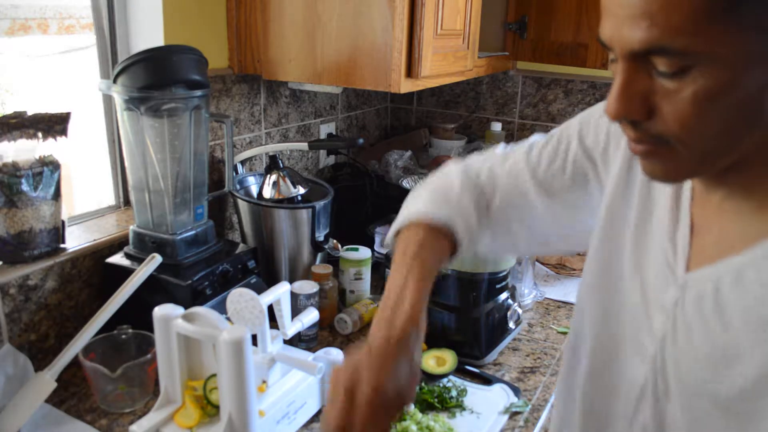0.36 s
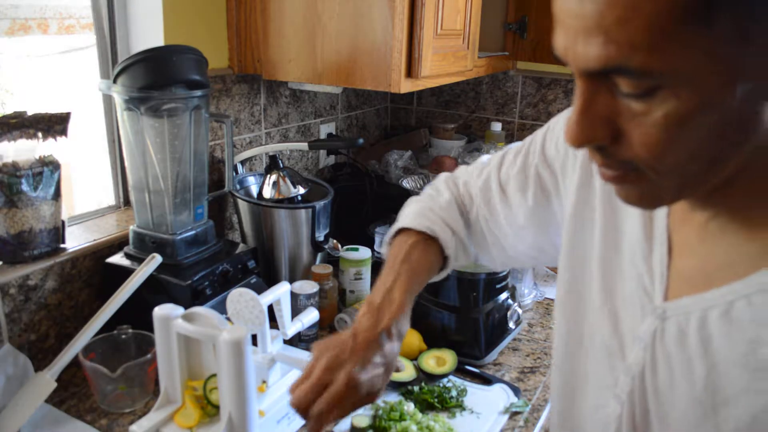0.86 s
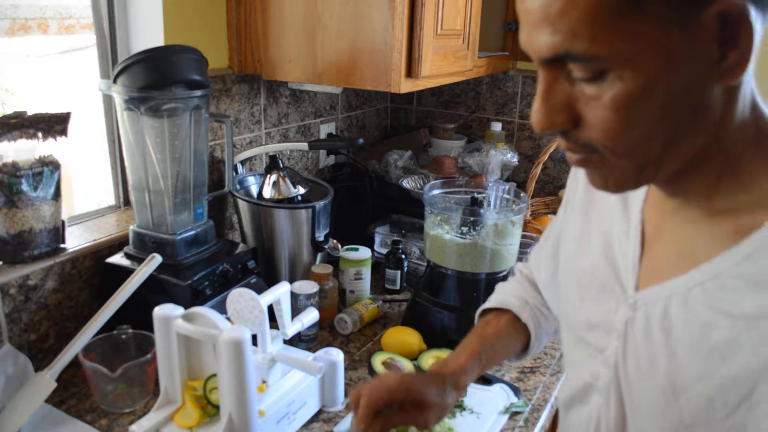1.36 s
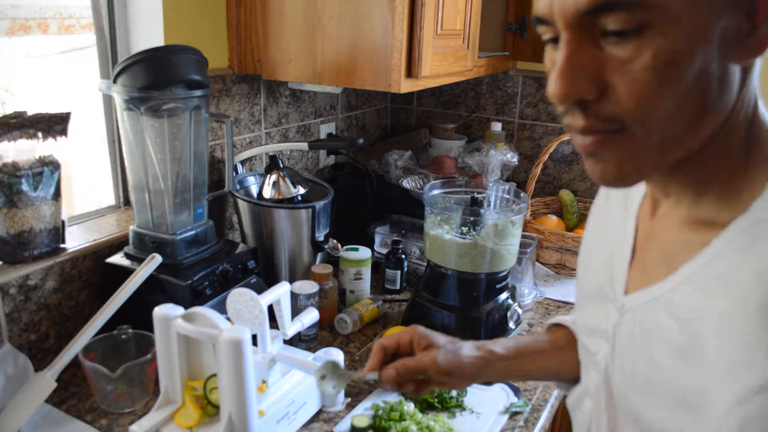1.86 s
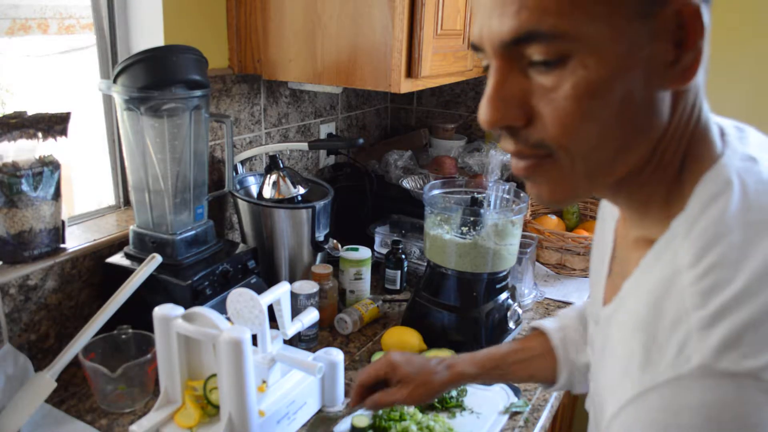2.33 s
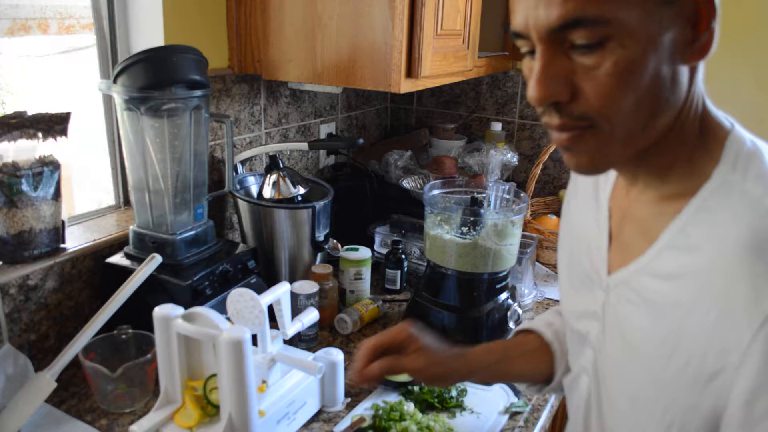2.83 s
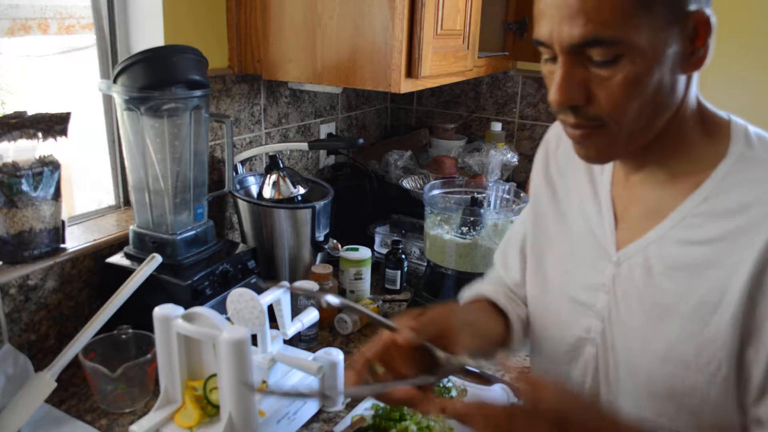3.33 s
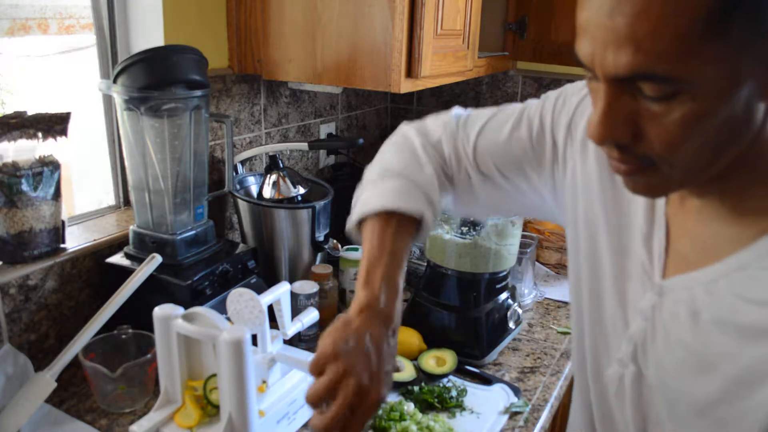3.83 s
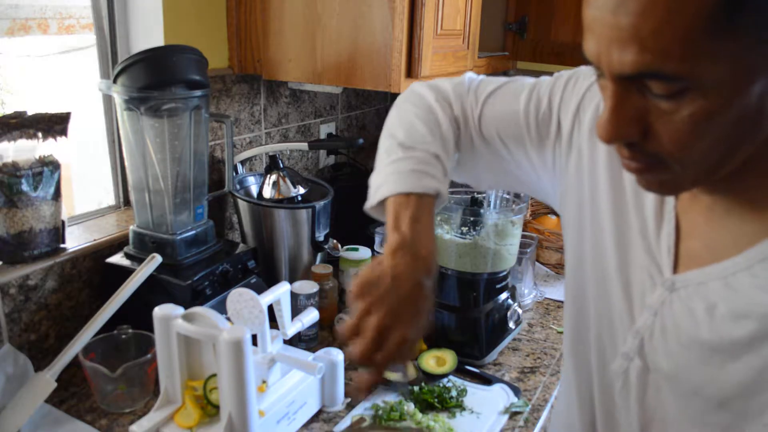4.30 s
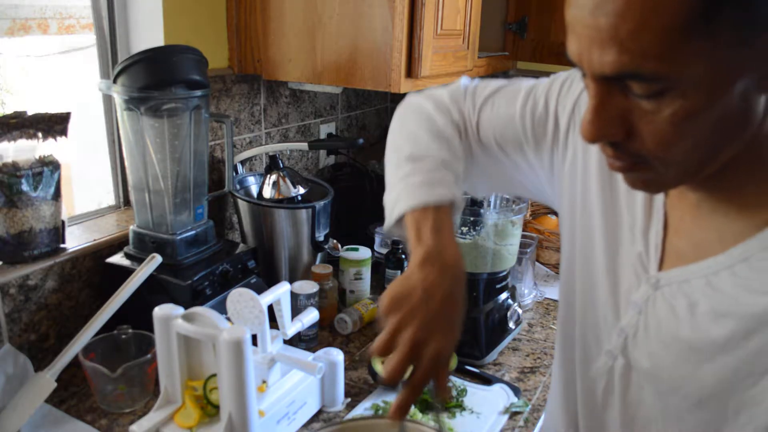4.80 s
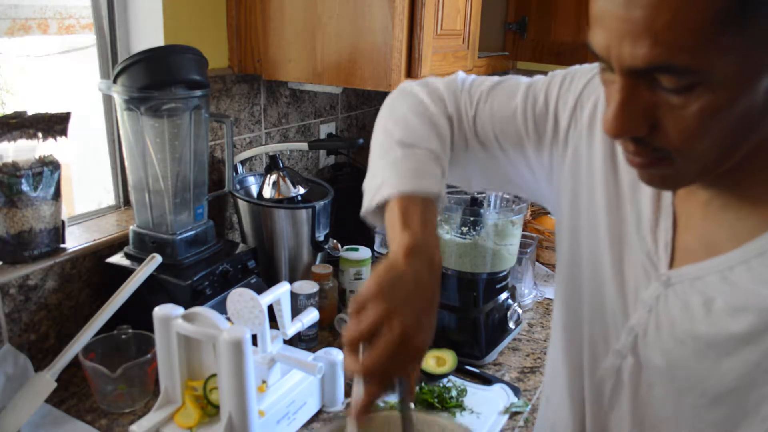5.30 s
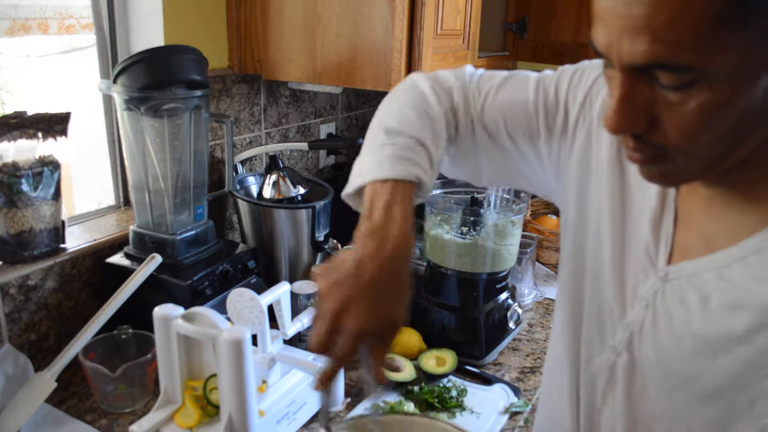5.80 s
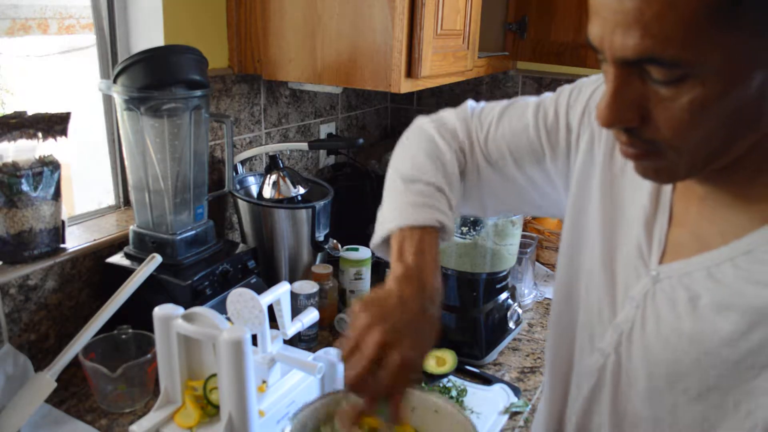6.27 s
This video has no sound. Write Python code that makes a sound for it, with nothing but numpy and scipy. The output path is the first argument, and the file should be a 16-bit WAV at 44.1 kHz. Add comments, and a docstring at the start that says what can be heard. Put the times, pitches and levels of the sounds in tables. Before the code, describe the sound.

Close metal spoon bangs on a bowl rim, spoon and fork clink and slide together, then soft wet rustles of food being tossed over appliance hum.

```python
"""Three knocks of a spoon on a bowl, a rattle and clink as spoon and fork are gathered, one more strike on
the bowl, then chopped food tossed in it: a small hard kitchen with appliance hum, heard close to.
Blows are short noise bursts shaped by the resonances of cutlery and bowl; slides are grains ringing
spoon and fork; cloth and food are swelling hiss and crackle; hums are unsteady sines and band noise.
Echoes answer the cutlery and bowl, and the microphone clips whatever passes full scale."""
import sys
import numpy as np
from scipy import signal
from scipy.fft import rfft, irfft, next_fast_len
from scipy.io import wavfile
from scipy.ndimage import uniform_filter1d

SR = 44100
rng = np.random.default_rng(int(sys.argv[2]) if len(sys.argv) > 2 else 0)


def store_wav(level_fs):
    """Save 16-bit WAV to argv[1]."""
    pcm = np.round(np.clip(np.atleast_2d(level_fs), -1, 1) * 32767)
    wavfile.write(sys.argv[1], SR, pcm.T.astype(np.int16))


def magnitude_from_level(level_db):
    """Linear magnitude for a level in decibels (20 dB per decade)."""
    exponent = np.asarray(level_db, float) / 20
    return 10 ** exponent


N = 282372  # length in samples
SWELL_DB = 20  # how far a swell climbs in its rise_s and drops in its fall_s


def evened(x):
    """Scales to rms 1."""
    return x / np.sqrt(np.mean(x ** 2) + 1e-20)


def read(points, hz):
    """Reads a (hz, value) table on a log-frequency axis."""
    f, value = np.transpose(points)
    return np.interp(np.log(hz + 1), np.log(f + 1), value)


def curve(rows, column=1, quiet=-120):
    """One column of a table over time for every sample, quiet outside the table."""
    rows = np.array(rows)
    return np.interp(np.arange(N) / SR, rows[:, 0], rows[:, column], quiet, quiet)


def add(mix, s, sound):
    """Mixes a sound in at s seconds."""
    part = mix[round(s * SR):][:len(sound)]
    part += sound[:len(part)]


def coloured(x, points):
    """Filters by a spectrum, rms 1."""
    size = next_fast_len(len(x))
    gain = magnitude_from_level(read(points, np.fft.rfftfreq(size, 1 / SR)))
    return evened(irfft(rfft(x, size) * gain, size)[:len(x)])


def band(x, lo_hz, hi_hz):
    """Band-pass, rms 1."""
    return evened(signal.sosfilt(signal.butter(2, [lo_hz, hi_hz], "bandpass", fs=SR, output="sos"), x))


def tone(hz, level, waver):
    """A sine of given pitch and rms level, its pitch a little unsteady."""
    hz = hz * (1 + waver * evened(uniform_filter1d(rng.standard_normal(N), 200)))
    return np.sqrt(2) * level * np.sin(2 * np.pi * np.cumsum(hz) / SR)


def swells(rows):
    """Level of a row of swells, each climbing to its peak and falling away evenly in dB."""
    t = np.arange(0, N / SR, .001)
    power = 0
    for s, db, rise, fall in rows:
        away = np.minimum(np.maximum((s - t) / rise, (t - s) / fall), 5)
        power = power + magnitude_from_level(2 * (db - SWELL_DB * away))
    return np.interp(np.arange(N) / SR, t, np.sqrt(power))


def grains(per_s, spread_db):
    """Sparse clicks of uneven size and random sign."""
    size = magnitude_from_level(spread_db * np.minimum(rng.exponential(1, N), 5)) * rng.choice([-1, 1], N)
    return size * (rng.random(N) < per_s / SR)


# spectrum of the steady wash: pitch_hz, density_db [dB per Hz, relative]
WASH = [(12, -51), (20, -26.5), (60, -6), (204, -15.5), (293, 1.5), (328, -11), (367, -5.5), (660, -5),
        (738, -3), (1190, -2), (1710, -9.5), (5530, -24.5), (7950, -21.5), (11800, -29), (16000, -27)]
# fuzzy appliance tones: pitch_hz, width_hz, level_db [relative]
FUZZY_TONES = [(257.6, 135, 1), (1180, 82, -1), (2990, 170, -13), (6700, 50, -13), (7900, 90, -19),
               (8900, 46, -20.5), (9250, 34, -12), (10100, 100, -11), (13100, 91, -38)]
# thin steady whine: pitch_hz, level_db
WHINE = [(15665, -68.5)]
WASH_DB, FUZZY_TONES_DB = -44, -51.5  # rms of each whole layer


def floor():
    """Steady shaped noise, narrow bands of noise as appliance tones, and a sine whine."""
    wash = magnitude_from_level(WASH_DB) * coloured(rng.standard_normal(N), WASH)
    hz = np.fft.rfftfreq(N, 1 / SR)
    shape = sum(magnitude_from_level(db) / (1 + (2 * (hz - f) / width) ** 4) for f, width, db in FUZZY_TONES)
    fuzzy = magnitude_from_level(FUZZY_TONES_DB) * evened(irfft(rfft(rng.standard_normal(N)) * shape, N))
    t = np.arange(N) / SR
    whine = sum(np.sqrt(2) * magnitude_from_level(db) * np.sin(2 * np.pi * f * t) for f, db in WHINE)
    return wash + fuzzy + whine


def rumble():
    """Low band noise whose level wavers slowly about -57.5 dB."""
    slow = uniform_filter1d(uniform_filter1d(rng.standard_normal(N), size=6000), size=6000)
    waver_db = 1.5 * evened(slow)
    return magnitude_from_level(-57.5 + waver_db) * band(rng.standard_normal(N), 28.4, 80)


MAINS_HZ, MAINS_DB = 58.4, -64
MOTOR_HZ, MOTOR_DB = 145, -62.5  # a second, fuzzier hum


def appliance_hum():
    """Two low sines whose pitch jitters enough to blur them."""
    return tone(MAINS_HZ, magnitude_from_level(MAINS_DB), 0.034) + tone(MOTOR_HZ, magnitude_from_level(MOTOR_DB), 0.038)


# strokes of hand and cutlery through cloth and food:
# peak_s, level_db, rise_s, fall_s, dull_db [dull part relative to level_db]
RUBS = [(.114, -51.5, .012, 0.25, 1), (.268, -50, .02, 0.12, 3.5), (.492, -53, .02, .08, -15),
        (.63, -41, 0.099, 0.086, -6.5), (.75, -54, .1, .3, -16), (1.054, -53, .04, .03, -10),
        (3.9, -39.5, 0.21, 0.15, -2.5), (4.149, -45, 0.11, .35, -13), (4.369, -37.5, 0.13, 0.23, -11),
        (4.6, -43.5, 0.23, 0.92, -12), (4.78, -33, 0.029, 0.06, -9.5), (4.9, -47, 0.072, 0.5, -4),
        (4.989, -41, .015, .2, -8.5), (5.18, -39.5, 0.1, .1, -17), (5.384, -38, .03, 0.097, -1.5),
        (5.56, -48, 0.53, 0.16, -0.5), (5.8, -57, .5, .5, -5), (5.969, -36.5, 0.046, 0.044, -10),
        (6.045, -43, 0.033, 0.44, -7), (6.2, -42, 0.012, .05, -9), (6.25, -45.5, .03, 0.11, 3),
        (6.39, -47, .3, .2, -2)]
# spectrum of fine crackle and hiss: pitch_hz, density_db [dB per Hz, relative]
RUSTLE = [(2940, -61), (5000, -10), (5430, -10), (5960, -11.5), (6570, -8), (8500, -2), (9830, 2),
          (14100, -17.5), (16000, -37)]


def rustle():
    """Fine moist crackle over soft hiss; each stroke adds its own share of duller scrape that swells faster."""
    hiss = coloured(rng.standard_normal(N), RUSTLE)
    crackle = coloured(grains(1457, 6.1), RUSTLE)
    bright = evened(hiss + .5 * crackle)
    dull = band(grains(1700, 0.96), 1400, 5800)
    bright_rows = [row[:-1] for row in RUBS]
    dull_rows = [(s, db + dull_db, 0.76 * rise, 0.8 * fall) for s, db, rise, fall, dull_db in RUBS]
    return swells(bright_rows) * bright + swells(dull_rows) * dull


# a faint tone swells twice: peak_s, level_db, rise_s, fall_s
MOANS = [(.15, -51, 0.24, 0.32), (.55, -49, 0.33, 0.65)]
MOAN_HZ, MOAN_CLIMB_HZ_PER_S = 552, 15.65  # pitch at the start, and its climb


def moan():
    """A nearly steady sine that climbs slowly in pitch under two swells."""
    return tone(MOAN_HZ + MOAN_CLIMB_HZ_PER_S * np.arange(N) / SR, swells(MOANS), .002)


def resonances(modes, grip_t60, hz, place_db):
    """Spectrum of a held thing: the grip widens every mode, the place of the blow weights them."""
    mode_hz, db, t60 = np.transpose(modes)[:, :, None]
    width = 2.2 * (1 / t60 + 1 / grip_t60)  # Hz: faster decay, wider resonance
    power = magnitude_from_level(2 * (db + place_db[:len(modes), None])) / (1 + (2 * (hz - mode_hz) / width) ** 4)
    return np.sqrt(power.sum(0))


def chatter(noise, t60, rise, hold, shape):
    """Rattling contact: a dying burst of the given spectrum; a longer hold spreads the same energy."""
    t = np.arange(len(noise)) / SR
    onset = np.minimum(t / rise, 1)
    envelope = magnitude_from_level(-60 * np.maximum(t - hold, 0) / t60) * onset
    for _ in range(4):  # restore the envelope, then keep the phases and set the magnitudes
        noise = envelope * noise / np.sqrt(abs(uniform_filter1d(noise ** 2, size=200)) + 1e-20)
        noise = irfft(np.exp(1j * np.angle(rfft(noise))) * shape)
    fade = np.clip(2 - 2 * (t - hold) / t60, 0, 1)
    same_energy = np.sqrt(np.mean(noise ** 2) / np.mean(magnitude_from_level(-120 * t / t60)))
    return noise * onset * fade / same_energy


# modes of the spoon: pitch_hz, level_db [relative], t60_s [when free]
SPOON = [(6630, 2.5, 0.36), (7210, -17, .2), (7560, 1.5, 0.15), (8410, -16, 0.312), (8390, 5, .2),
         (9260, -5.5, 0.27), (9100, -6.5, .2), (9300, 2.5, 0.13), (10210, 5, 0.24), (9690, 4.5, 0.23),
         (10720, -3, .2), (11490, -23, .2), (11400, -6.5, .1), (11600, 1.5, 0.102), (12400, -13, .05),
         (14230, -5, 0.051), (15200, -20.5, .05)]
# spectrum of the dry contact click: pitch_hz, level_db [relative]
CLICK = [(150, -15.5), (500, -4), (1500, 1), (3000, -3.5), (5000, -9), (9000, -19), (13000, -34),
         (17000, -47)]
LINGER_S = .004  # the lighter the blow, the longer the rattle holds: seconds per tenfold drop in force


def blows(table, thing, grip_t60, ring_t60, place_db, spoon_t60, rise, detune):
    """Each blow makes the gripped spoon chatter, rings the thing it meets and leaves a short dry click."""
    out, hz = np.zeros(N), np.fft.rfftfreq(4096, 1 / SR)
    chance = rng.standard_normal((len(table), 2, 20))
    noise = rng.standard_normal((len(table), 3, 4096))
    for (s, spoon_db, thing_db, click_db, tilt_db), u, n in zip(table, chance, noise):
        tilt = magnitude_from_level(tilt_db * np.log2(hz / 2500 + 0.25))  # a soft contact favours low tones
        hold = LINGER_S * np.clip(-max(spoon_db, thing_db, click_db) / 20, 0, 2)
        # every blow shifts the modes and their balance a little
        spoon = resonances(SPOON, .0052, hz * (1 + .012 * u[0, -1]), 2 * u[0])
        body = tilt * resonances(thing, grip_t60, hz * (1 + detune * u[1, -1]), place_db * u[1])
        click = tilt * magnitude_from_level(read(CLICK, hz))
        add(out, s, magnitude_from_level(spoon_db) * chatter(n[0], spoon_t60, rise, hold, spoon))
        add(out, s, magnitude_from_level(thing_db) * chatter(n[1], ring_t60, rise, hold, body))
        add(out, s, magnitude_from_level(click_db) * chatter(n[2], 0.021, 0.00034, hold, click))
    return out


# spoon on rim: start_s, spoon_db, rim_db, click_db, tilt_db [brightness per octave]
RIM_TAPS = [(.265, -44, -43, -44, -9), (1.637, -31, -20, -35, -5.5), (2.6964, -15.5, -15.5, -18, 1.5),
            (2.7025, -30, -25, -13.5, 0.5), (2.794, -20.5, -45, -15.5, 3.5), (2.8290, -23, -36, -21.5, -1),
            (2.902, -40, -56, -20.5, 0.5), (2.9075, -31, -23, -28, -17), (3.704, 1, -6.5, -12.5, 1),
            (4.7554, -31, -71, -31, 3), (5.369, -39, -39, -55, -5), (5.3783, -28, -31, -47, -1.5),
            (6.2462, -32.5, -40, -40, -6)]
# modes of the rim: pitch_hz, level_db [relative], t60_s [when free]
RIM = [(800, -11, 0.5), (902, -10.5, .6), (1310, -10, .1), (1850, -14, .1), (2040, -5, .3), (2220, -22, .2),
       (2480, -10, 0.36), (3200, -34, 0.19), (3725, -10.5, 0.13), (4370, -10.5, .2), (4950, 2.5, 0.21),
       (5185, -4.5, 0.19), (5650, -5, 0.17), (6400, -15.5, .2), (7650, 0, 0.37), (7740, -7.5, 0.22)]


def rim_taps():
    """Spoon and bowl rim ring together, mostly lightly, with one hard strike."""
    return blows(RIM_TAPS, RIM, 0.016, 0.059, 0.51, 0.028, .0015, 0.0013)


# spoon on fork: start_s, spoon_db, fork_db, click_db
CLINKS = [(0.486, -42, -56, -58), (0.6844, -36.5, -57, -58), (2.4532, -20.5, -18, -33),
          (2.464, -19.5, -18, -27), (2.5079, -8, -8, -38), (2.5194, -2.5, -24, -32), (2.545, -16, -30, -25),
          (2.5773, -9, -13.5, -22), (2.6084, -14, -18, -42), (2.6602, -24, -15, -28),
          (2.6764, -13.5, -34, -34), (2.987, -36.5, -44, -34.5), (2.992, -41, -42, -48),
          (3.1626, -43, -32.5, -57), (3.2083, -29, -31, -40), (3.2144, -30, -27, -41),
          (3.2296, -29, -20.5, -38), (3.2623, -11.5, -11, -33), (3.2808, -36, -27, -36),
          (3.3015, -38, -27, -39), (3.4334, -19, -35, -39), (3.4412, -23, -26, -43),
          (3.6132, -38.5, -48, -52), (4.985, -33.5, -55, -43), (5.142, -30.5, -48, -39),
          (5.1647, -23.5, -42, -42), (6.0347, -30, -54, -55)]
# modes of the fork: pitch_hz, level_db [relative], t60_s [when free]
FORK = [(4040, -18, .3), (4740, -7, .4), (5220, -2.5, .2), (5540, -3, .4), (6030, -8, .2), (7720, -2, 0.22),
        (9000, -18.5, .3), (8900, -3, .2), (9540, -11, .2), (10700, -3.5, .3), (11020, -16, 0.17),
        (12170, -1.5, .25), (13700, -31.5, 0.091), (14200, -8.5, .08)]
CLINK_TILT_DB = 3.4  # brightness of steel on steel, dB per octave


def clinks():
    """Steel on steel: two held pieces of cutlery ring high and briefly."""
    tilted = [(*row, CLINK_TILT_DB) for row in CLINKS]
    return blows(tilted, FORK, 0.012, 0.055, 6.6, 0.035, 0.0017, 0.0078)


# spoon on bowl: start_s, spoon_db, bowl_db, click_db, tilt_db [brightness per octave]
KNOCKS = [(1.1406, 5, -6.5, -4.5, 0), (1.3169, 4.5, -7, -5, 2.6), (1.508, 6, -7, -4, 1.5),
          (1.6338, -14, -27.5, -14, 12), (1.641, -14.5, -30, -23.5, -16)]
# modes of the bowl: pitch_hz, level_db [relative], t60_s [when free]
BOWL = [(119.7, -22, 0.122), (159, -23, 0.2), (250, -13.5, .3), (300, -15, .3), (359, -15, .2),
        (550, -9.5, 0.55), (623, -5, 0.47), (653, -3.5, 0.74), (698, -8, .3), (753, -2.5, 0.44),
        (927, -13.5, 0.15), (1287, -16.5, 0.18), (1510, -34.5, .2), (1863, -10, 0.024), (2352, -10, 0.057),
        (2890, -27.5, .2), (3314, -22, .15)]


def knocks():
    """The spoon rings high while the body of the bowl answers with low modes."""
    return blows(KNOCKS, BOWL, 0.031, 0.081, 2.6, 0.03, 0.0014, .008)


# bumps through the counter: peak_s, level_db, rise_s, fall_s
THUDS = [(1.146, -36, .005, .08), (1.322, -47, .005, .08), (1.513, -36, 0.0046, .08),
         (3.708, -37, 0.0047, 0.043), (4.355, -37, 0.079, 0.11), (5.1, -45, .06, 0.055)]


def thuds():
    """Short swells of low band noise as the counter carries the bumps."""
    return swells(THUDS) * band(rng.standard_normal(N), 25, 380)


# the counter booms briefly: peak_s, level_db, rise_s, fall_s
BOOMS = [(1.655, -33.5, .025, 0.11), (2.525, -36, .02, 0.073)]


def booms():
    """Short swells of noise in the counter's band near 300 Hz."""
    return swells(BOOMS) * band(rng.standard_normal(N), 252, 395)


# a far engine sinks in pitch: time_s, pitch_hz, level_db
DRONE = [(2.1, 93.2, -69), (2.9, 83.9, -60), (3.3, 78.1, -54.5), (3.75, 73.2, -59), (4.3, 66, -58),
         (4.8, 58.8, -53), (5.2, 58, -62.5), (5.6, 59.7, -69)]


def far_engine():
    """A low unsteady sine follows the engine's pitch and level."""
    return tone(curve(DRONE, quiet=0), magnitude_from_level(curve(DRONE, column=2)), 0.027)


def ring(modes, grip_t60, spread_db, split, chance):
    """One slip on a held thing: each mode is a close group of three that the grip damps; peak about 1."""
    hz, db, t60 = np.repeat(modes, 3, axis=0).T[:, :, None]
    t, u = np.arange(SR // 12) / SR, chance[:len(hz), :, None]
    size = magnitude_from_level(db + spread_db * u[:, 0])
    fall_db = 60 * t * (1 / t60 + 1 / grip_t60)
    wave = np.sin(2 * np.pi * hz * (1 + split * u[:, 1]) * t + 10 * u[:, 2])
    contact = np.minimum(t / 0.00061, 1) ** 2  # the contact builds up within a millisecond
    return contact * (size * magnitude_from_level(-fall_db) * wave).sum(0) / np.linalg.norm(size)


# spoon and fork sliding on each other: peak_s, level_db, rise_s, fall_s
SLIDES = [(2.512, -4.5, 0.0067, 0.011), (2.552, -17.5, .03, .06), (2.59, -19, .02, .08),
          (2.672, -20, 0.099, 0.025)]
# both drag over the counter meanwhile; the fall is the time for SWELL_DB
SCRAPE_S, SCRAPE_DB, SCRAPE_HOLD_S, SCRAPE_FALL_S = 2.508, -27, 0.18, 0.15


def slide():
    """Uneven slips ring the spoon, and the fork in three random balances and tunings; a scrape joins them."""
    fork = np.zeros(N)
    for chance in rng.standard_normal((3, 60, 3)):
        fork += signal.oaconvolve(grains(90, 3.8), ring(FORK, 0.018, 4, 0.041, chance))[:N]
    spoon_ring = ring(SPOON, 0.028, 3.4, 0.0343, rng.standard_normal((60, 3)))
    spoon = signal.oaconvolve(grains(374, 3.1), spoon_ring)[:N]
    crackle = coloured(grains(2000, 2.2), RUSTLE)
    bright = evened(evened(fork) + 0.49 * evened(spoon) + .5 * crackle)
    since = np.arange(N) / SR - SCRAPE_S
    drop_db = SWELL_DB * np.maximum(since - SCRAPE_HOLD_S, 0) / SCRAPE_FALL_S
    drag = (since > 0) * magnitude_from_level(SCRAPE_DB - drop_db)
    return swells(SLIDES) * bright + drag * band(grains(1200, 1.3), 340, 5700)


# cutlery squeaks on the glaze: peak_s, level_db, rise_s, fall_s
SQUEAK = [(4.375, -29, 0.021, 0.032)]
SQUEAK_HZ, SQUEAK_SAG_HZ_PER_S = 11300, 45000  # pitch at the peak, and its fall


def squeak():
    """A short whistle that sags in pitch between two limits."""
    since = np.arange(N) / SR - SQUEAK[0][0]
    hz = np.clip(SQUEAK_HZ - SQUEAK_SAG_HZ_PER_S * since, 10300, 11900)
    return tone(hz, swells(SQUEAK), .005)


# decay of the room: pitch_hz, t60_s
KITCHEN = [(200, 0.6), (530, 0.43), (1390, 0.32), (3680, 0.33), (9700, 0.28), (15500, 0.19)]
TURNS_PER_S = 1.7  # how fast three sets of random echoes trade places


def kitchen(x):
    """Dense echoes of random sign, each band dying at its own speed; three sets take turns steadily."""
    taps = rng.choice([-1., 1.], (3, SR // 2)) * (rng.random((3, SR // 2)) < .2)
    taps[:, :SR // 300] = 0  # the nearest wall answers after 3 ms
    hz, t, z = signal.stft(taps, SR, nperseg=256)
    decay = magnitude_from_level(-60 * t / read(KITCHEN, hz)[:, None])
    tail = signal.istft(z * decay, SR, nperseg=256)[1]
    turn = 2 * np.pi * TURNS_PER_S * np.arange(N) / SR
    share = np.sqrt(2 / 3) * np.cos(turn + np.arange(3)[:, None] * np.pi / 3)  # total power stays 1
    return signal.oaconvolve(x * share, tail / np.linalg.norm(tail[0]), axes=1)[:, :N].sum(0)


def scene():
    """Near sounds with the room's answer 6 dB down, over rustle, floor and lows."""
    near = rim_taps() + clinks() + knocks() + slide() + squeak()
    lows = rumble() + appliance_hum() + moan() + thuds() + booms() + far_engine()
    return (near + magnitude_from_level(-6.0) * kitchen(near) + rustle() + floor() + lows)[None]


def low_pass(x):
    """Removes everything above the highest recorded frequency."""
    return signal.sosfilt(signal.butter(12, 16290, fs=SR, output="sos"), x)


def record(dry):
    """The microphone channel: a steep band limit at 15750 Hz, then clipping at full scale."""
    edge = signal.firwin(511, 15750, window=("kaiser", 9), fs=SR)
    limited = signal.oaconvolve(dry, edge[None], "same")
    return low_pass(np.clip(limited, -1, 1))


dry = scene()
out = record(dry)
store_wav(out)
```